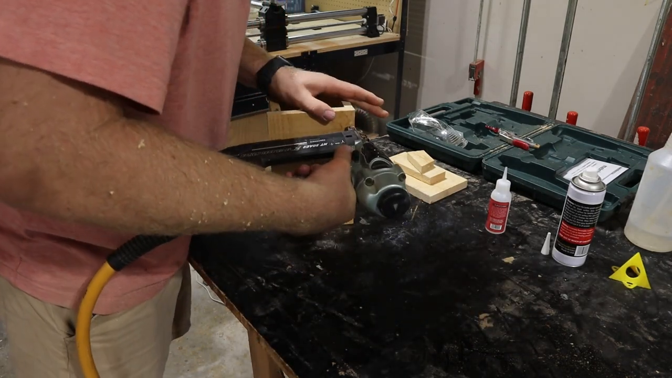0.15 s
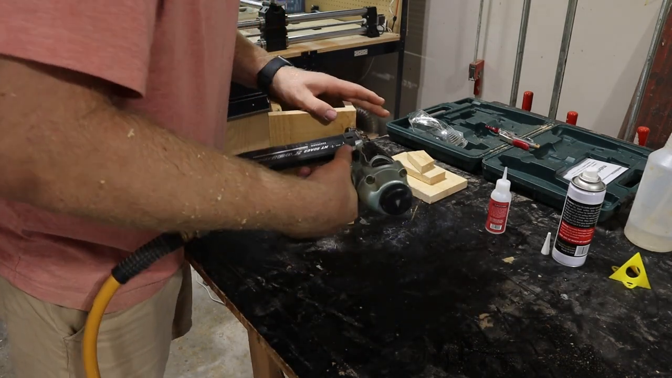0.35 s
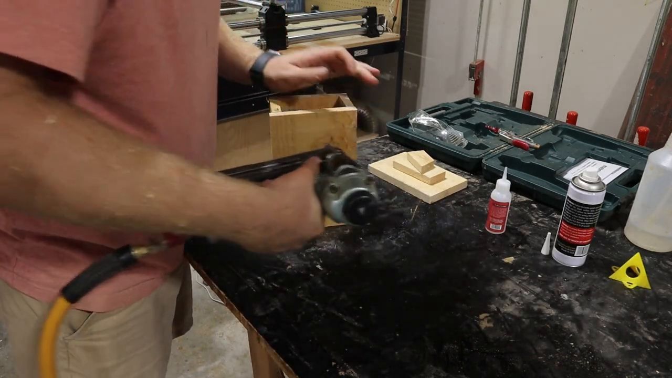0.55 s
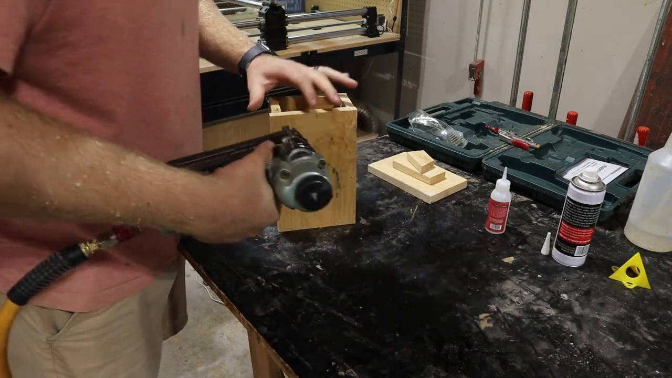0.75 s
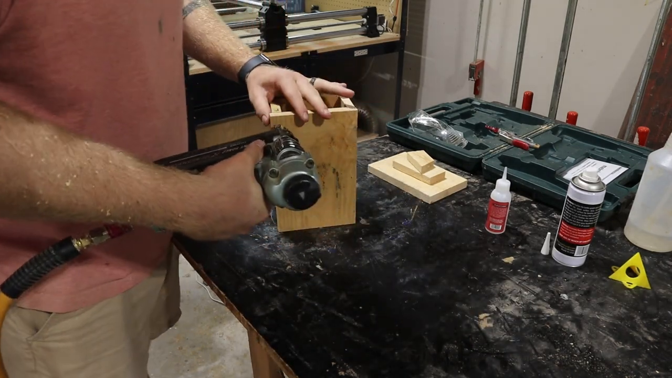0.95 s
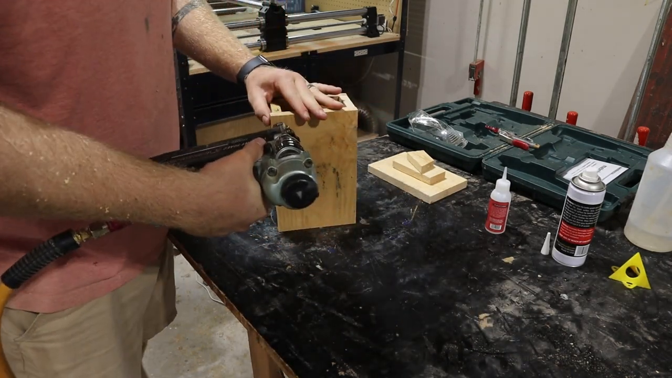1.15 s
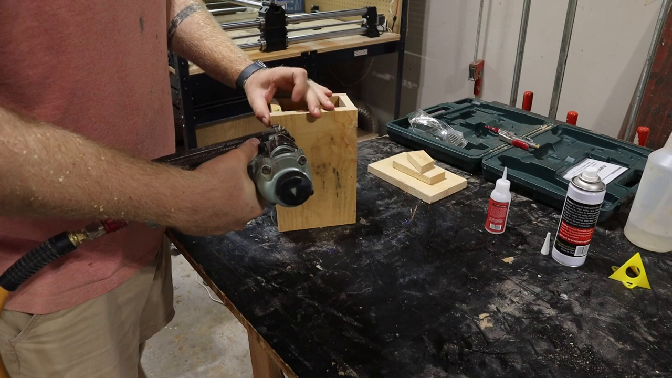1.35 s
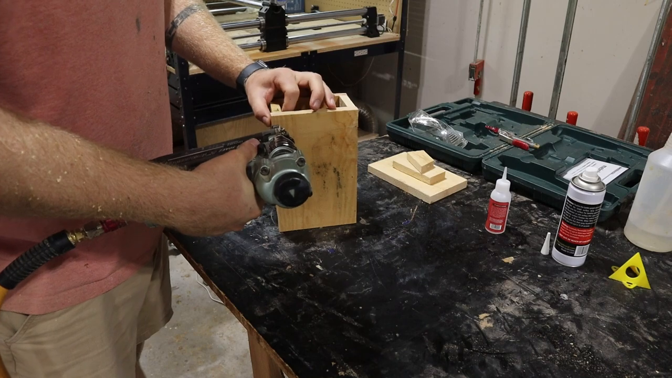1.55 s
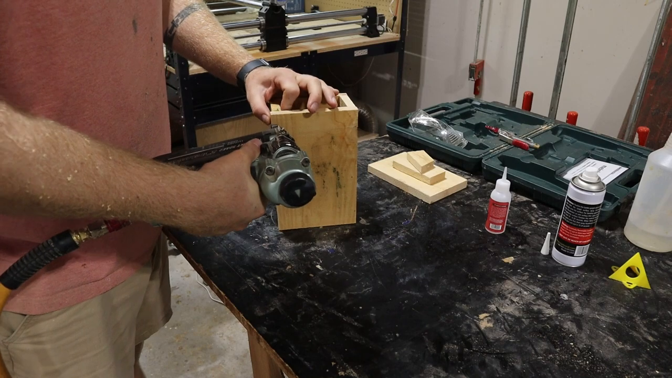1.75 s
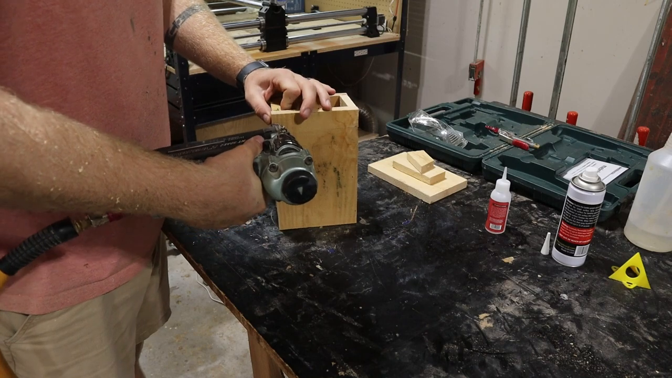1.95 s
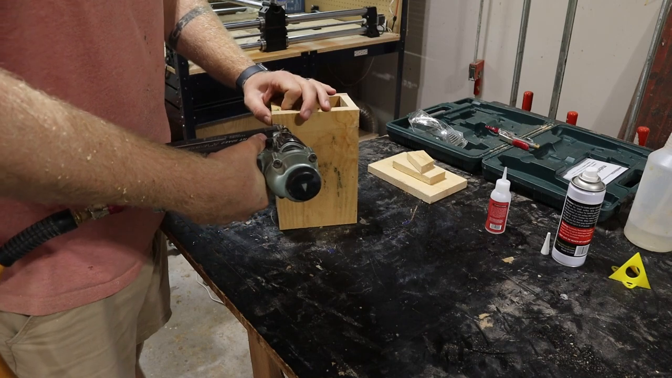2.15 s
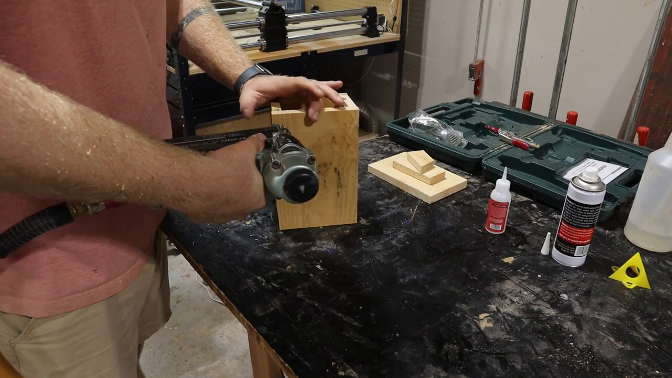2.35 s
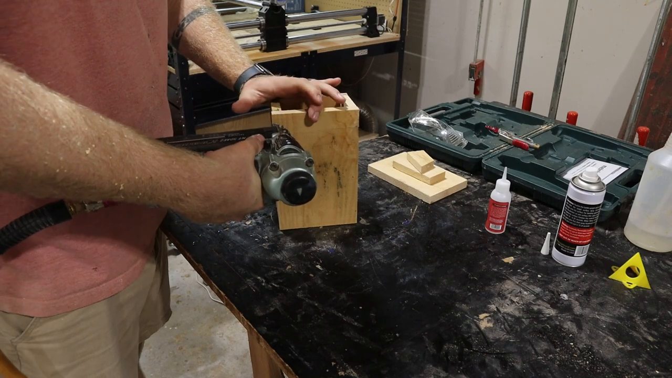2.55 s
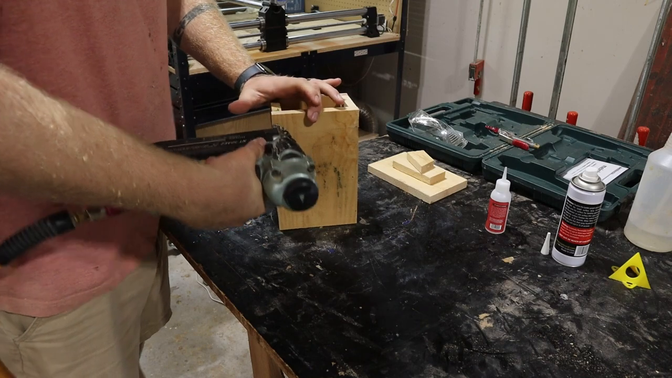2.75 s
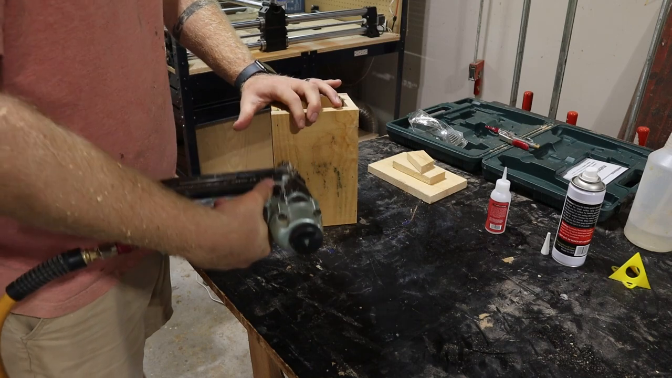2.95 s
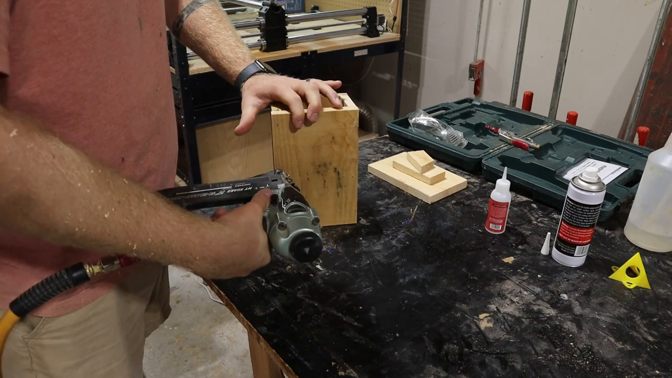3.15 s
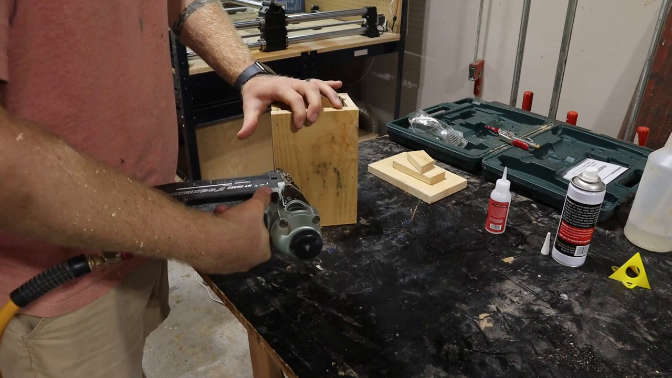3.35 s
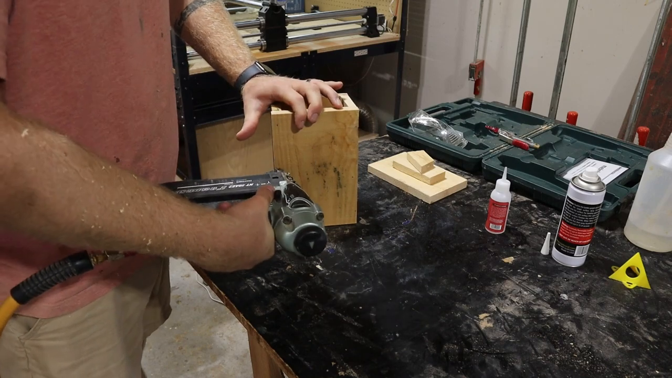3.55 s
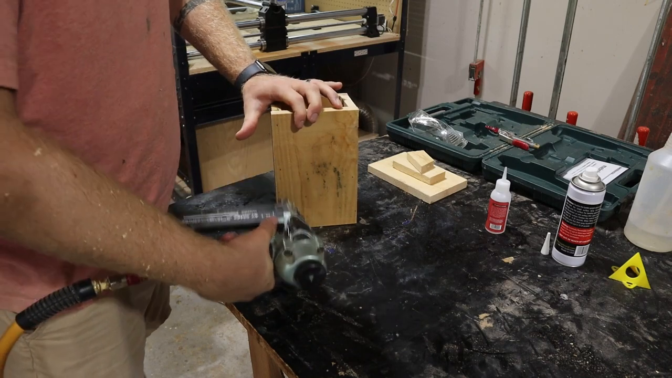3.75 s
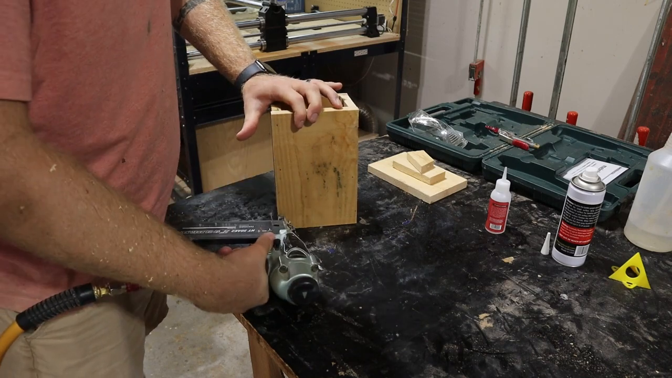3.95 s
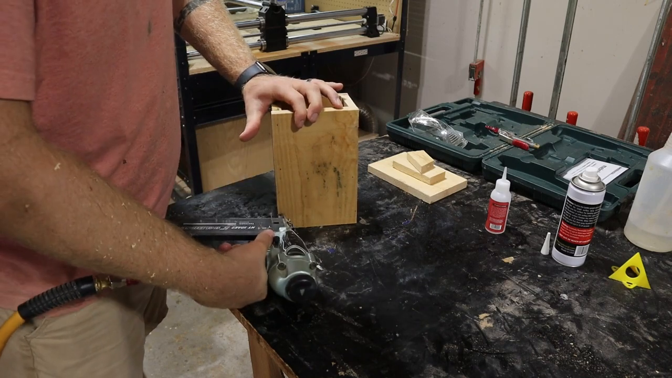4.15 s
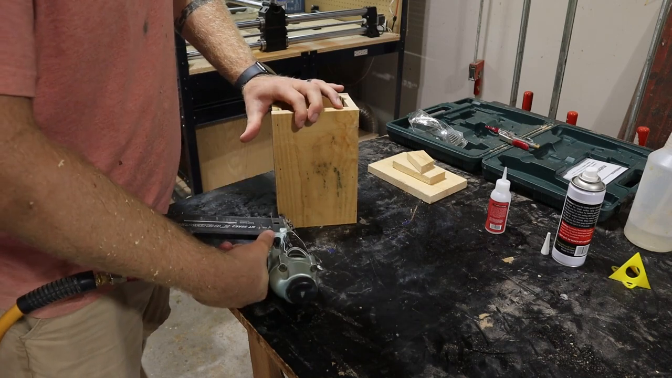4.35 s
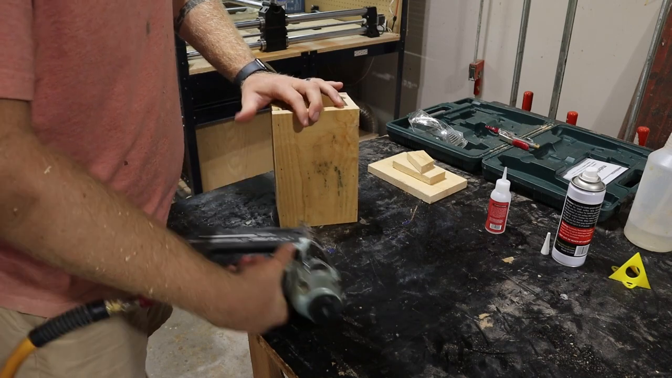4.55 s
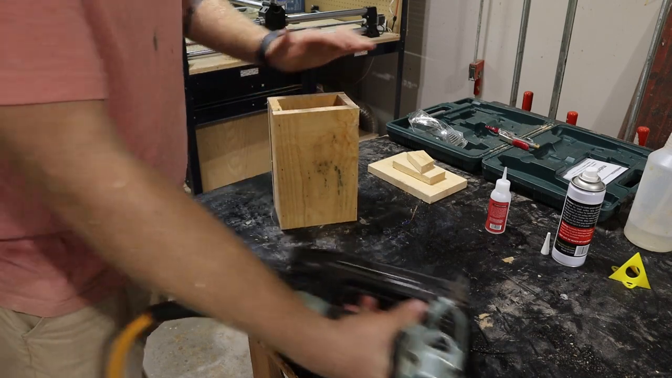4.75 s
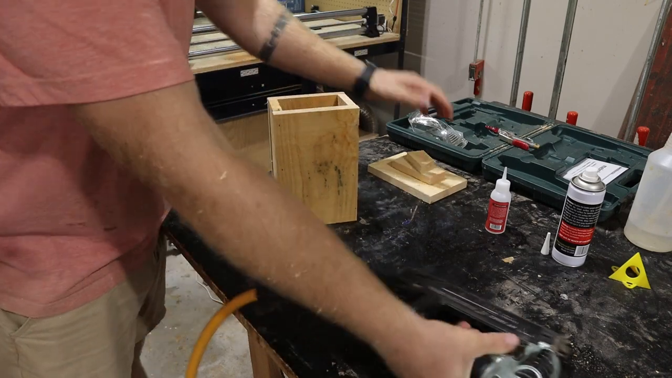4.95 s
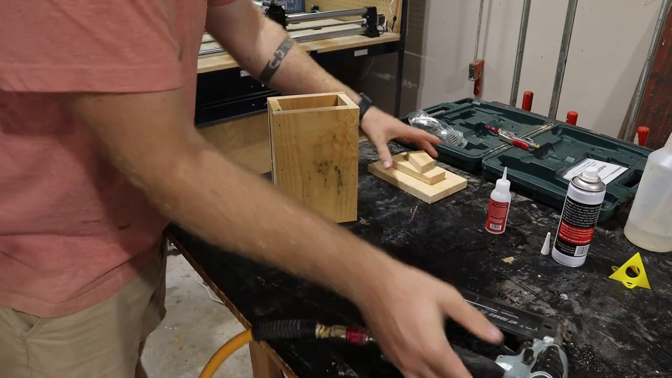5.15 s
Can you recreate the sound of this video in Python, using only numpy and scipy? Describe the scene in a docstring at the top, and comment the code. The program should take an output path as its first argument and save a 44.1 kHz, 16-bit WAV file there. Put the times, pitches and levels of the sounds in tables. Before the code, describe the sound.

Four loud nail gun shots with spits of air and light knocks between them, ending in a thudding clatter in a small workshop.

```python
"""Four sharp bangs, each with a spit and a hiss, among light knocks, then a clatter on a bench.
An air nailer drives thin nails into a wooden box in a small workshop and is laid down.
Each shot is a quick run of blows that ring the tool and the box; letting go of the trigger lets the
air out. The microphone overloads and a limiter turns it down, so the room's ring and the hiss swell
as the volume comes back."""
import sys
import numpy as np
from scipy import signal
from scipy.fft import rfft, irfft, next_fast_len
from scipy.io import wavfile

SR = 44100
rng = np.random.default_rng(int(sys.argv[2]) if len(sys.argv) > 2 else 0)


def to_wav(sig):
    """Store sig (one row per channel, or 1-D mono) as 16-bit WAV at the path in sys.argv[1].

    Samples outside -1..1 are clipped; the rate is SR.
    """
    pcm = np.clip(np.atleast_2d(sig), -1, 1) * 32767
    pcm = np.round(pcm).astype(np.int16)
    wavfile.write(sys.argv[1], SR, pcm.T)  # frames by channels


N = 233681
TIME = np.arange(N) / SR
SLIDE_START_S, SLIDE_FADE_S = 1.29, .04  # the hand starts sliding the nailer into place

# Levels in all tables are relative. A "colour" says how strong a noise is at each frequency.
# the shots: firing t/s, trigger release t/s, crack/dB, ring/dB, recoil puff/dB, exhaust puff/dB
SHOTS = [(0.2636, 0.3576, 1, -2.5, -7.5, -36), (2.6574, 2.7772, 2.5, 6, -26.5, -27),
         (3.5580, 3.6620, 2.5, 6.5, -31, -14), (4.3867, 4.5005, 0.5, 2, -4.5, -12.5)]
# ringing tones of the nailer's body and nail holder: f/Hz, width/Hz, level/dB
METAL_MODES = [(800, 96, -7.5), (944, 83, -6), (1146, 150, 0), (1505, 490, -7), (1767, 280, -2.5),
               (2480, 360, -8.5), (2970, 240, -7.5), (3750, 380, -11.5)]
# colour of a small, bright tick: f/Hz, level/dB
TICK_COLOUR = [(1500, -14.5), (3500, -10), (5400, 1), (7500, -15.5), (16000, -14)]


def amp(db):
    """Turn decibels into a volume factor."""
    return 10 ** (np.asarray(db) / 20)


def rms_one(x):
    """Scale a sound to an average power of 1."""
    return x / np.sqrt(np.mean(x ** 2) + 1e-20)


def at_hz(points, hz):
    """Read between the rows of a table, on a scale where all octaves are equally wide."""
    f, value = np.transpose(points)
    return np.interp(np.log(np.maximum(hz, 1)), np.log(f), value)


def noise(colour):
    """Steady noise of a given colour, with power 1."""
    size = next_fast_len(N)
    hz = np.fft.rfftfreq(size, 1 / SR)
    spectrum = rfft(rng.standard_normal(size)) * amp(at_hz(colour, hz))
    return rms_one(irfft(spectrum, size)[:N])


def ramp(start, seconds):
    """Rise from 0 to 1 in a given time."""
    return np.clip((TIME - start) / seconds, 0, 1)


def smooth(x, seconds):
    """Follow a signal slowly, evening out its quick changes."""
    r = np.exp(-1 / (seconds * SR))
    return signal.lfilter([1 - r], [1, -r], x + 1e-18)


def uneven(spread_db, seconds=0.022):
    """A volume that wanders at random, as a sliding surface catches and comes free."""
    return amp(spread_db * rms_one(smooth(rng.standard_normal(N), seconds)))


def strikes(rows):
    """Volume curve of sudden hits (t/s, level/dB, t60/s); t60 is the time to fade by 60 dB."""
    power = np.zeros(N)
    for s, db, t60 in rows:
        span = slice(int(s * SR), int((s + 2 * t60) * SR))
        power[span] += amp(db - 60 * np.maximum(TIME[span] - s, 0) / t60) ** 2
    return np.sqrt(power)


def resonate(force, modes):
    """A force rings an object's own tones, its modes; narrower ones ring longer."""
    out, power = 0, 0
    for k, (hz, width, db) in enumerate(modes):
        r = np.exp(-np.pi * width / SR)
        gain = amp(db) * (1 - r * r) / 2
        feedback = [1, -2 * r * np.cos(2 * np.pi * hz / SR), r * r]
        out = out + (-1) ** k * signal.lfilter([gain, 0, -gain], feedback, force + 1e-18)
        power += amp(db) * gain
    return out / np.sqrt(power)


def struck(s, db, t60, modes, grit, scatter_db=1.5):
    """One hit, a sharp push and a gritty chatter, rings an object; each spot favours other tones."""
    t, out = TIME[:SR // 4], np.zeros(N + SR)
    force = grit * amp(-60 * t / t60) * rng.standard_normal(len(t))
    force[0] += np.sqrt(t60 * SR / np.log(1e6))  # the sharp push
    spot_modes = [(hz, width, level + scatter_db * rng.standard_normal()) for hz, width, level in modes]
    out[int(s * SR):][:len(t)] = amp(db) * resonate(force, spot_modes)
    return out[:N]


def puff(s, db, width_s):
    """One swing of air pressure, down and then up."""
    u = np.clip((TIME - s) / width_s, -10, 10)
    return amp(db) * u * np.exp((1 - u * u) / 2)


def background(floor_db=-69.5, hum_db=-3, fan_db=-73):
    """Soft room noise with a faint hum and a distant fan."""
    # colour of the quiet room: f/Hz, level/dB
    floor_colour = [(15, -25), (25, -14), (108, -4.5), (212, -14), (242, -11.5), (363, -7), (439, -12.5),
                    (624, -11), (695, -25.5), (840, -12), (1160, -17), (3620, -22.5), (4740, -30),
                    (14000, -44), (16000, -51.5)]
    # steady humming tones: f/Hz, level/dB
    hum_tones = [(59.2, -74), (96.9, -79), (188.4, -74), (344.5, -78)]
    # the narrow band the fan sings in: f/Hz, width/Hz, level/dB
    fan_band = [(862, 39, 0)]
    hum = sum(amp(db + hum_db) * np.sqrt(2) * np.sin(2 * np.pi * (hz * TIME + rng.random()))
              for hz, db in hum_tones)
    fan = amp(fan_db) * resonate(rng.standard_normal(N), fan_band)
    return hum + fan + amp(floor_db) * noise(floor_colour)


def box(s, db, hz):
    """A knock rings the hollow wooden box."""
    # tones of the box: multiple of its pitch, width/Hz, level/dB
    wood_modes = [(.55, 90, -9), (.8, 60, -6), (1, 32, 3), (1.2, 70, -6), (1.85, 90, -7)]
    modes = [(multiple * hz, width, level) for multiple, width, level in wood_modes]
    return struck(s, db, t60=.02, modes=modes, grit=.3)


def steel(touches, body_db, nose_db, tick_db, body_t60=0.03, tick_t60=0.02):
    """Touches (t/s, level/dB) ring the nailer's body, and tick and ping at its steel nose."""
    # tones of the nose and its safety tip: f/Hz, width/Hz, level/dB
    nose_modes = [(3194, 93, 0.5), (5680, 190, -3.5), (7100, 220, -25)]
    body = sum(struck(s, db, body_t60, METAL_MODES, grit=0.86) for s, db in touches)
    nose = sum(struck(s, db, tick_t60, nose_modes, grit=0.24) for s, db in touches)
    tick = strikes([(s, db, tick_t60) for s, db in touches]) * noise(TICK_COLOUR)
    return amp(body_db) * body + amp(nose_db) * nose + amp(tick_db) * tick


def knocks(wood_db=7):
    """A knock sounds both box and steel; the safety tip clicks in the steel alone, and brighter."""
    # the nose is set against the box: t/s, level/dB, wood pitch f/Hz, extra for the steel/dB
    contacts = [(0.075, -40, 569, -4), (1.976, -35.5, 515, -2.5), (2.061, -48.5, 408, -1.5),
                (2.266, -47, 488, 2), (3.164, -49, 486, -4.5), (3.406, -36.5, 535, -0.5),
                (4.018, -42.5, 460, -19), (4.077, -51, 522, -2), (4.208, -36.5, 425, -1),
                (4.215, -44, 419, 5), (4.255, -48, 554, -2.5), (4.335, -51, 573, 1.5)]
    # clicks of the springy safety tip: t/s, level/dB
    tip_clicks = [(0.075, -45.5), (1.358, -60), (1.388, -55), (1.458, -57), (1.583, -56), (1.889, -53),
                  (3.360, -52.5), (4.055, -56)]
    wood = sum(box(s, db + wood_db, hz) for s, db, hz, _ in contacts)
    touches = [(s, db + steel_db) for s, db, _, steel_db in contacts]
    tool = steel(touches, body_db=2, nose_db=-7.5, tick_db=-5)
    tip = steel(tip_clicks, body_db=1.5, nose_db=-2.5, tick_db=3)
    return wood + tool + tip


def firing(valve_db=-33, valve_lead_s=.006, crack_db=-1, ring_db=-6, recoil_lag_s=.0082):
    """The air valve fizzes open, the blows crack and ring tool and box, and the tool kicks back."""
    # driver hits nail, piston hits bumper, nose hits wood: t/s after firing, level/dB, t60/s
    blows = [(0, -7.5, .026), (.0056, 4, .036), (.0095, -1.5, .04)]
    # tones of nailer and box ringing together: f/Hz, width/Hz, level/dB
    shot_modes = [(806, 26.7, 2), (1150, 93, -2.5), (1660, 200, 3), (1840, 350, 2), (2376, 36, -0.5),
                  (3100, 180, -6.5), (3457, 290, -3)]
    # colour of the crack: f/Hz, level/dB
    crack_colour = [(60, -18), (200, -12), (480, -4), (650, -7.5), (1100, -3.5), (1700, -2), (2600, -5.5),
                    (4200, -13.5), (5300, -15), (7500, -20), (16000, -21.5)]
    opening = sum(np.interp(TIME - s, [-valve_lead_s, 0], [0, 1], right=0) for s, *_ in SHOTS)
    valve = amp(valve_db) * opening * noise(TICK_COLOUR)
    cracks = strikes([(s + lag, db + blow_db, t60)
                      for s, _, db, *_ in SHOTS for lag, blow_db, t60 in blows])
    ring = sum(struck(s + lag, db + blow_db, t60, shot_modes, grit=0.34)
               for s, _, _, db, *_ in SHOTS for lag, blow_db, t60 in blows)
    recoil = sum(puff(s + recoil_lag_s, db, width_s=0.0016) for s, *_, db, _ in SHOTS)
    return valve + amp(crack_db) * cracks * noise(crack_colour) + amp(ring_db) * ring + recoil


def exhaust(jet_db=2.5, jet_lag_s=0.0018, jet_hold_s=0.024, sag_db_per_s=400, shut_db_per_s=4501,
            hiss_db=-28.5, swell_s=.097, fall_db_per_s=167):
    """Letting go of the trigger frees the air in a thump and a sharp jet; the rest hisses away."""
    # the valve shuts, the piston comes home: t/s after release, level/dB, t60/s
    returns = [(0, -3.5, 0.011), (0.0266, -4, 0.02)]
    # colour of those two clacks: f/Hz, level/dB
    clack_colour = [(200, -10.5), (700, -11), (1400, -4.5), (2300, 3), (3300, -3.5), (5000, -22.5),
                    (16000, -21)]
    # colour of the jet: f/Hz, level/dB
    jet_colour = [(100, -0.5), (400, -4), (1200, -11.5), (3000, -3), (6000, 0.5), (8500, 1), (12500, 4.5),
                  (16000, 0.5)]
    # colour of the hiss: f/Hz, level/dB
    hiss_colour = [(200, -19.5), (450, -14), (900, -1), (1500, -5.5), (2400, -6), (4300, -7), (5700, -4.5),
                   (9000, -11.5), (13000, -12), (16000, -21)]
    # the low thump of the air gusting out: f/Hz, width/Hz, level/dB
    thump_modes = [(210, 170, 0)]
    jet = hiss = gust = 0
    for _, s, *_, puff_db in SHOTS:
        open_s = np.maximum(TIME - s - jet_lag_s, 0)
        sag_db = sag_db_per_s * open_s  # the pressure drops
        shut_db = shut_db_per_s * np.maximum(open_s - jet_hold_s, 0)  # the piston shuts off the jet
        jet += ramp(s + jet_lag_s, seconds=0.0023) * amp(jet_db - sag_db - shut_db)
        fall_db = fall_db_per_s * np.maximum(TIME - s - swell_s, 0)  # the cylinder empties
        hiss += ramp(s, swell_s) * amp(hiss_db - fall_db)
        thump = struck(s + 0.0045, db=-10 + .33 * puff_db, t60=0.024, modes=thump_modes, grit=.3)
        gust += thump + puff(s + .0065, puff_db, width_s=.002)
    clacks = strikes([(s + lag, db, t60) for _, s, *_ in SHOTS for lag, db, t60 in returns])
    return jet * noise(jet_colour) + hiss * noise(hiss_colour) + clacks * noise(clack_colour) + gust


def rubbing(firm_at_s=2.17, firm_db=-58.5, growth_db_per_s=11.5):
    """Hand and tool rub on the box, pressing harder until firm, then holding until the second shot."""
    # colour of the low rub: f/Hz, level/dB
    rub_colour = [(24, -26), (40, -14.5), (101, 1.5), (151, -20), (189, -3), (226, -15), (283, -5),
                  (402, -8.5), (697, -14.5), (873, -9), (1090, -15.5), (1760, -19.5), (2000, -25),
                  (2910, -20), (16000, -53)]
    pressed = ramp(SLIDE_START_S, SLIDE_FADE_S) - ramp(SHOTS[1][0], SLIDE_FADE_S)
    grip = amp(firm_db - growth_db_per_s * np.maximum(firm_at_s - TIME, 0))
    return pressed * grip * uneven(spread_db=2.5) * noise(rub_colour)


def scraping(slide_s=1.25, scrape_db=-85, slip_db=-76, spread_db=8, slip_t60=0.02, count=12):
    """The sliding steel nose scrapes faintly, with small slips at random moments."""
    slips = strikes([(SLIDE_START_S + slide_s * when, slip_db + spread_db * force, slip_t60)
                     for when, force in rng.random((count, 2))])
    sliding = ramp(SLIDE_START_S, SLIDE_FADE_S) - ramp(SLIDE_START_S + slide_s, SLIDE_FADE_S)
    return (slips + amp(scrape_db) * sliding * uneven(spread_db=0.5)) * noise(TICK_COLOUR)


def fumbling(earliest_s=1.7, latest_s=1.8, tap_db=-58, spread_db=6, count=9):
    """The nose catches lightly on the wood while it slides into place."""
    span_s = latest_s - earliest_s
    return sum(box(latest_s - span_s * when, tap_db + spread_db * (force - .5), hz=330 + 200 * spot)
               for when, force, spot in rng.random((count, 3)))


def laying_down(thud_db=-2, clatter_db=-2, tick_db=-10, shudder_db=-13,
                thud_t60=0.045, clatter_t60=0.036, shudder_t60=0.28,
                bounce_s=0.021, shrink=.65, loss_db=11):
    """The nailer lands on one edge, rocks and drops onto its side, shaking the bench."""
    # the landings: t/s, thud/dB, clatter/dB
    landings = [(5.038, -30.5, -25.5), (5.132, -39.5, -37.5), (5.168, -37, -50), (5.230, -23.5, -33.5),
                (5.281, -24, -33.5)]
    # tones of the bench top: f/Hz, width/Hz, level/dB
    bench_modes = [(134, 56, -12), (243, 79, -1), (335, 31, -0.5), (475, 52, 0), (670, 110, -6.5),
                   (763, 38, 1), (905, 83, -1.5)]
    # colour of things shuddering on the bench: f/Hz, level/dB
    shudder_colour = [(50, -10), (130, 4), (300, 1), (480, 4.5), (700, -9), (1500, -10), (4000, -32),
                      (16000, -67)]
    # every landing bounces, each time sooner and weaker
    bounces = [(bounce_s * sum(shrink ** np.arange(k)), loss_db * k) for k in range(3)]
    hits = [(s + lag, thud - loss, clatter - loss)
            for s, thud, clatter in landings for lag, loss in bounces]
    thud = sum(struck(s, db, thud_t60, bench_modes, grit=0.67) for s, db, _ in hits)
    clatter = sum(struck(s, db, clatter_t60, METAL_MODES, grit=1.47) for s, _, db in hits)
    tick = strikes([(s, db, clatter_t60) for s, _, db in hits]) * noise(TICK_COLOUR)
    shudder = strikes([(s, db, shudder_t60) for s, db, _ in hits]) * noise(shudder_colour)
    impacts = amp(thud_db) * thud + amp(clatter_db) * clatter + amp(tick_db) * tick
    return impacts + amp(shudder_db) * shudder


def room_ring(sound, build_up_s=0.002):
    """The workshop stores sound energy, and each frequency band loses it at its own rate."""
    # how long the room rings: f/Hz, t60/s
    fade_times = [(100, 0.01), (800, 0.3121), (3000, 0.54), (7000, 0.35), (15000, 0.1963)]
    # colour of the room's ring: f/Hz, level/dB
    room_colour = [(80, -17), (300, -2), (550, -1), (830, 5.5), (1700, -2.5), (3300, 1.5), (5000, -1),
                   (8000, 0), (15000, -2)]
    edges_hz = np.geomspace(70, 17000, 23)
    white, out = rng.standard_normal((2, N)), 0
    for k, (low, high) in enumerate(zip(edges_hz, edges_hz[1:])):
        hz = np.sqrt(low * high)
        band = signal.butter(2, [low, high], "band", fs=SR, output="sos")
        fed = smooth(signal.sosfilt(band, sound + 1e-12 * white[0]) ** 2, build_up_s)
        stored = smooth(fed, at_hz(fade_times, hz) / np.log(1e6))
        band_noise = rms_one(signal.sosfilt(band, white[k % 2]))
        out += amp(at_hz(room_colour, hz)) * np.sqrt(stored) * band_noise
    return out


def echoes(sound, first_s=.004, spread_s=.09, t60=0.33, count=60):
    """Quick echoes bounce back from bench, shelves and walls."""
    # small surfaces return little bass, and clutter scatters the treble
    reflected = signal.sosfilt(signal.butter(2, [450, 6000], "band", fs=SR, output="sos"), sound)
    response = np.zeros(SR)
    delay = first_s + spread_s * rng.random(count)
    response[(delay * SR).astype(int)] = rng.choice([-1, 1], count) * amp(-60 * delay / t60)
    return signal.fftconvolve(reflected, response / np.linalg.norm(response))[:N]


def scene(shot_room_db=-8, air_room_db=-16, handling_room_db=-6, ring_db=-2, echo_db=-4):
    """All the sounds share one room and reach a single microphone."""
    shots, air = firing(), exhaust()
    handling = knocks() + fumbling() + scraping() + laying_down()
    into_room = amp(shot_room_db) * shots + amp(air_room_db) * air + amp(handling_room_db) * handling
    room = amp(ring_db) * room_ring(into_room) + amp(echo_db) * echoes(into_room)
    mono = shots + air + handling + room + rubbing() + background()
    return np.array([mono, mono])


def record(dry, limit_db=-19, attack_s=0.0017, release_db_per_s=185, ceiling=.12,
           low_cut_hz=32, high_cut_hz=16000):
    """A limiter turns loud peaks down and recovers slowly; what slips past it is clipped flat."""
    heard = signal.sosfilt(signal.butter(2, low_cut_hz, "high", fs=SR, output="sos"), dry)
    over_db = np.maximum(20 * np.log10(np.abs(heard[0]) + 1e-9) - limit_db, 0)
    recovery_db = release_db_per_s * TIME
    turn_down_db = np.maximum.accumulate(over_db + recovery_db) - recovery_db
    limited = heard * amp(-smooth(turn_down_db, attack_s))
    clipped = np.clip(limited, -ceiling, ceiling)
    return signal.sosfilt(signal.ellip(10, .2, 70, high_cut_hz, fs=SR, output="sos"), clipped)


dry = scene()
out = record(dry)
to_wav(out)
```